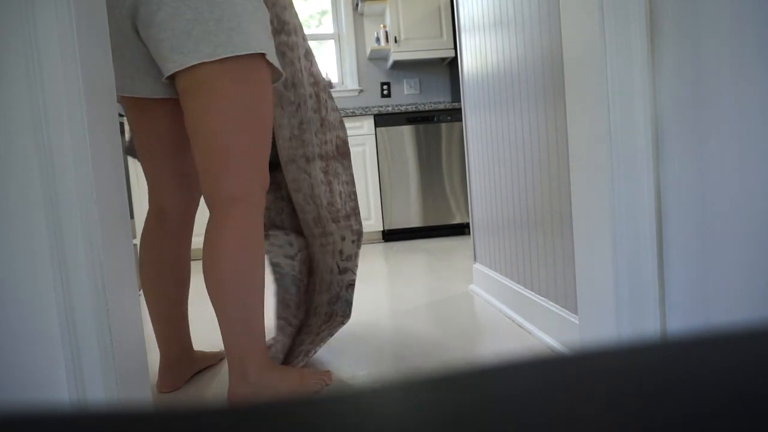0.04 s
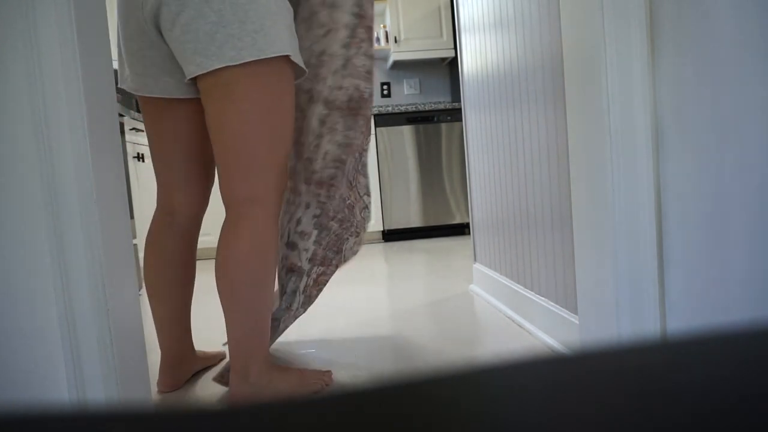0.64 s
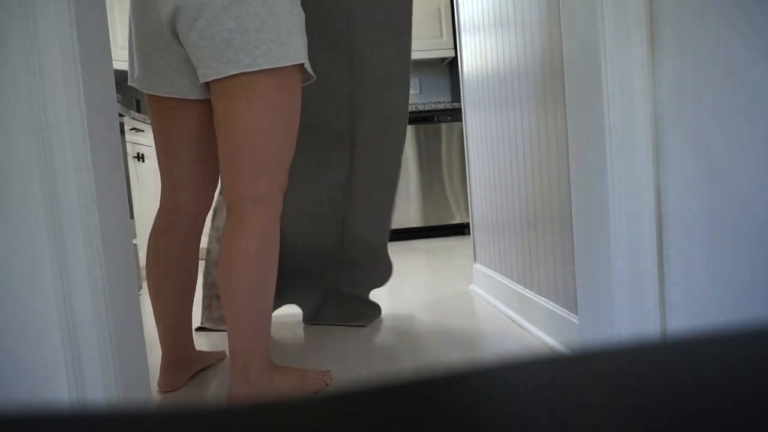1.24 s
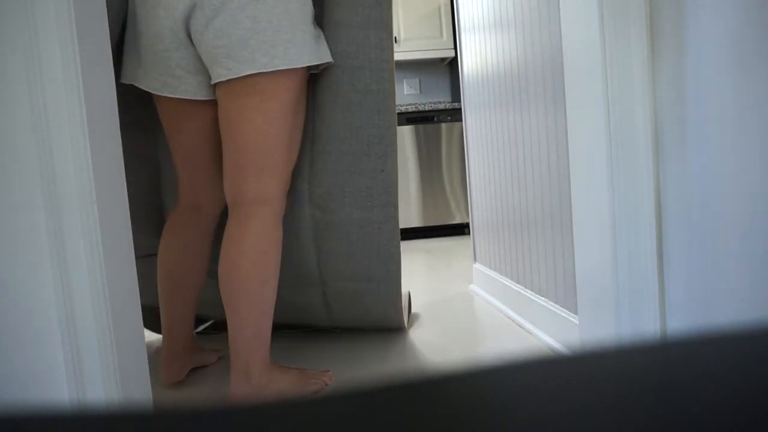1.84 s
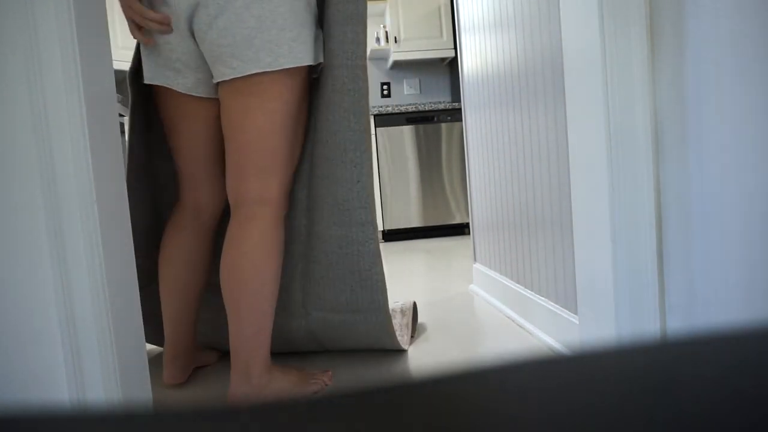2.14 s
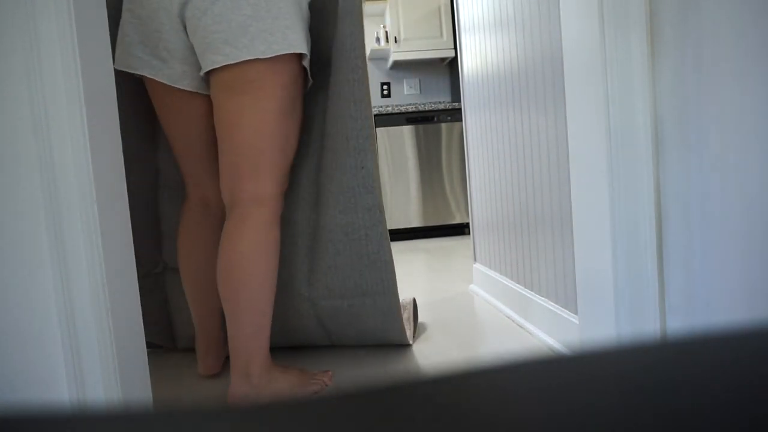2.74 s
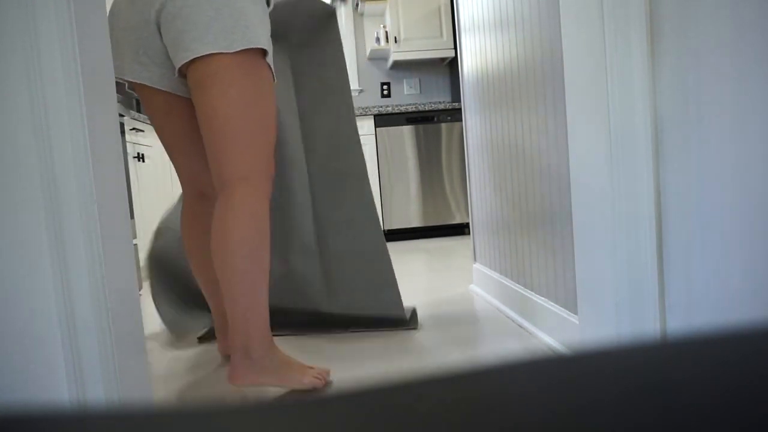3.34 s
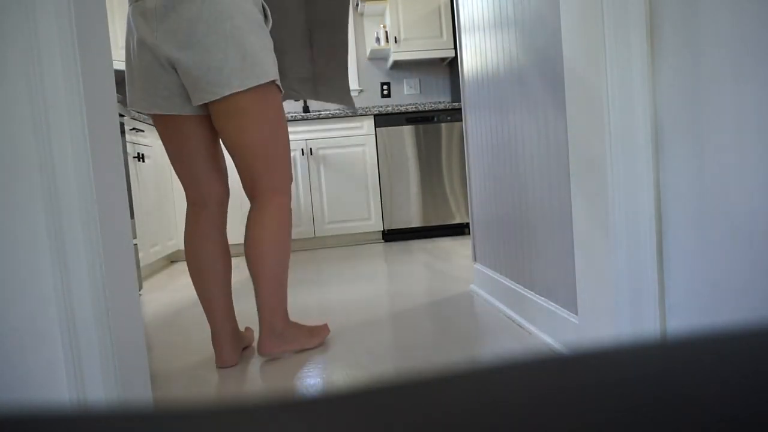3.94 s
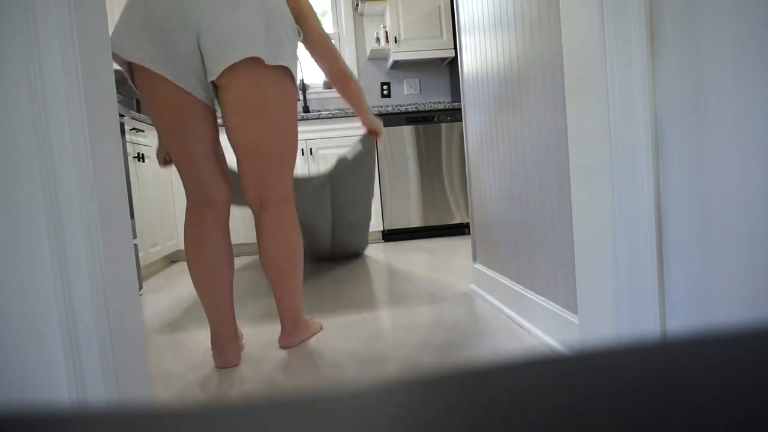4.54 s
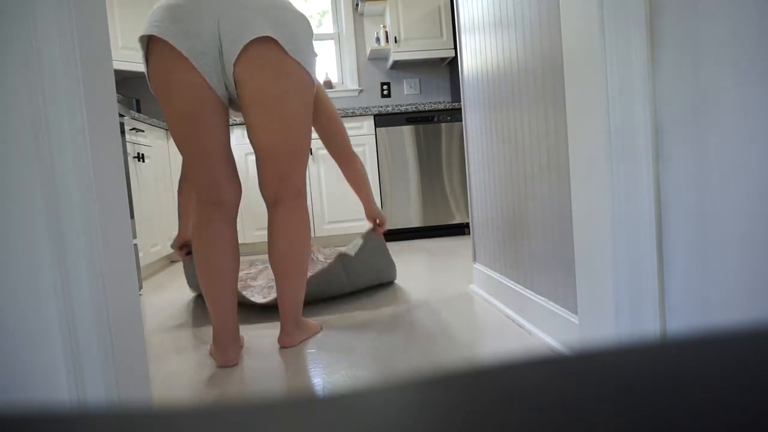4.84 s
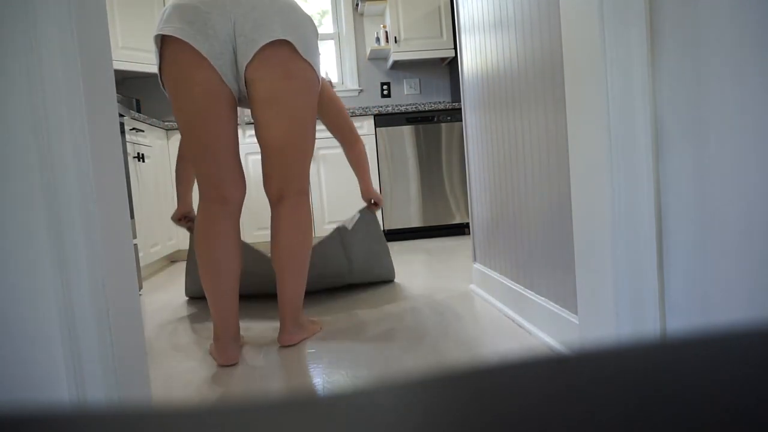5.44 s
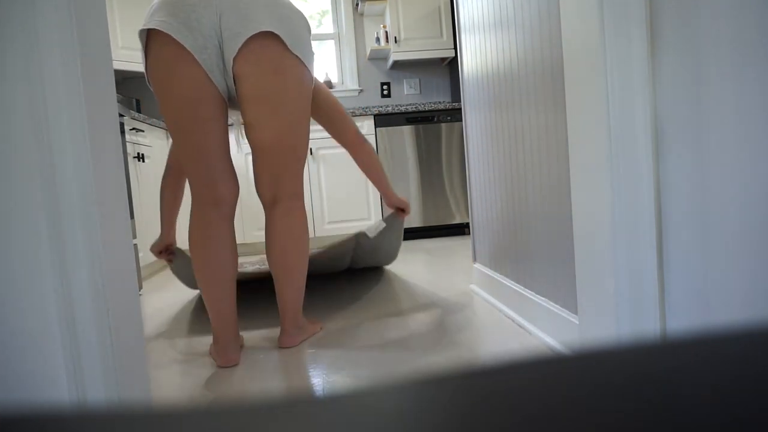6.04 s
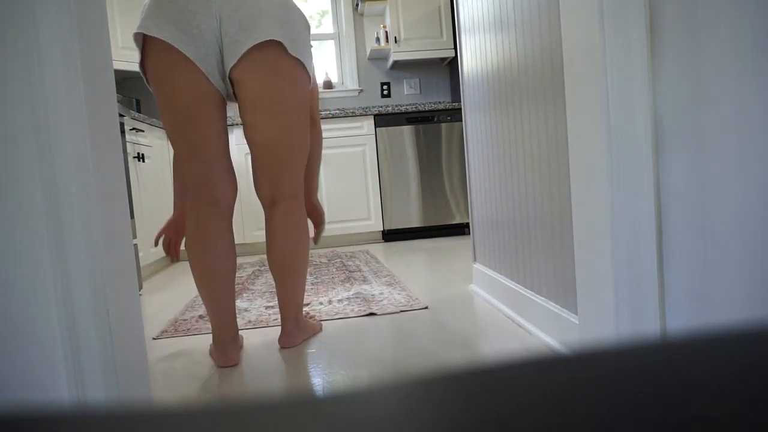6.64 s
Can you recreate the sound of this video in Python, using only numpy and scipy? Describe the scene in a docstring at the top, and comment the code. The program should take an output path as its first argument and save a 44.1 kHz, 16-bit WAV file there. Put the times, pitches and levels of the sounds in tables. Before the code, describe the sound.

A heavy woven rug is unfolded in a kitchen, rustling and sliding over itself with soft, dull flops. About halfway through it is shaken out with two loud, whooshing flaps, followed a second later by another crackling burst of flapping. After a lull it lands on the hard floor with a light slap and a brief brush. The room rings briefly over a faint appliance hum.

```python
"""Rug shaken out in a kitchen

A woven rug is unfolded, shaken out and laid on a hard floor. Each swing pushes air, makes the heavy
sheet flutter and sets creases and fibres crackling; between swings the cloth slides over itself.
The bound edge clicks, bare feet thud, the room rings briefly and an appliance hums."""
import sys
import numpy as np
from scipy import signal
from scipy.fft import rfft, irfft, next_fast_len
from scipy.io import wavfile

SR = 44100
rng = np.random.default_rng(int(sys.argv[2]) if len(sys.argv) > 2 else 0)


def put_to_file(sound):
    """Save the sound as 16-bit audio at rate SR, in the file named by the first command-line argument."""
    columns = np.atleast_2d(sound).T  # one column per channel
    safe = np.clip(columns, -1, 1)
    whole_steps = np.round(safe * 32767)
    wavfile.write(sys.argv[1], SR, whole_steps.astype(np.int16))


N = 295863
TIME_S = np.arange(N) / SR

# Event levels are relative, ahead of mix and room gains.
# rug whips out or slaps the floor: t/s, rise/s, level/dB, sharpness/dB (crackle), weight/dB (air, flutter)
SLAPS = [(3.22, 0.0054, -33, 4, 4.5), (4.558, 0.0022, -38, 5.5, 4), (4.562, 0.038, -26, 0.5, 0.5),
         (4.722, 0.001, -33.5, 2.5, 4.5), (4.868, 0.0024, -34, -2, 1), (6.187, 0.0018, -43.5, -12, -15),
         (6.2175, 0.00093, -34, -3, 2), (6.24, 0.017, -35.5, -3.5, -0.5), (6.342, 0.0037, -47, 10.5, 5),
         (6.418, 0.0041, -52, 7, -7)]
# rug swings and bellies out: t/s, rise/s, level/dB
BILLOWS = [(0.78, 0.031, -36), (1.243, 0.032, -36), (1.345, 0.058, -34), (1.44, 0.017, -37.5),
           (1.52, 0.02, -37), (1.56, 0.056, -39), (1.849, 0.02, -42.5), (2.058, 0.0079, -39),
           (2.74, 0.047, -39.5), (3.151, 0.04, -35.5), (3.29, 0.092, -29.5), (3.494, 0.0076, -33),
           (3.88, 0.04, -36.5), (4.60, 0.022, -31), (4.73, 0.013, -39), (4.80, 0.072, -36.5)]
# fold drops against the hanging rug: t/s, level/dB, crispness/dB (creases re body)
FLOPS = [(0.666, -35.5, -0.5), (0.76, -34, -35), (0.830, -36.5, -18), (0.848, -43.5, 6.5),
         (1.086, -42, 0.5), (1.166, -30.5, -16), (1.227, -29.5, -8.5), (1.936, -37, -3),
         (2.242, -37.5, -30), (3.066, -36.5, -11.5), (3.236, -28, -24), (3.447, -25, -8), (3.465, -39, -1)]
# rug scrapes over itself or the floor: t/s, rise/s, hold/s, level/dB
DRAGS = [(0.0, 0.0027, 0.11, -57.5), (0.096, 0.071, 0.043, -50.5), (0.282, 0.039, 0.032, -52.5),
         (0.592, 0.03, 0.011, -56), (1.215, 0.016, 0.0046, -45), (1.344, 0.015, 0.019, -49.5),
         (1.88, 0.061, 0.025, -46.5), (1.99, 0.014, 0.027, -47), (2.687, 0.035, 0.096, -57),
         (3.697, 0.033, 0.029, -59.5)]
# friction of the pile in the hands: t/s, level/dB
FRICTION = [(0.0, -56.5), (0.2, -60), (0.36, -64), (0.46, -62.5), (0.62, -59.5), (0.9, -56), (1.06, -62),
            (1.17, -58), (1.41, -57), (1.51, -58.5), (1.84, -55), (1.95, -51), (2.07, -54), (2.13, -58.5),
            (2.39, -58), (2.51, -56), (2.61, -50.5), (2.66, -54.5), (3.02, -53.5), (3.2, -43)]
# taut sheet pushes air: t/s, level/dB, f/Hz
PUFFS = [(0.768, -21, 630), (0.833, -24, 700), (1.259, -34, 171), (1.418, -14.5, 174), (1.433, -15.5, 387),
         (2.096, -26.5, 346), (2.247, -28.5, 630), (3.227, -11.5, 910), (3.246, -10.5, 170),
         (3.257, -14.5, 330), (3.264, -10.5, 126), (3.265, -10, 353), (3.442, -16, 157), (3.4513, -10, 416),
         (3.459, -5, 240), (4.725, -16.5, 410), (4.897, -30.5, 140), (6.222, -21.5, 800), (6.22, -25, 204)]
# stretched sheet drones: t/s, rise/s, t60/s, f/Hz, level/dB
DRONES = [(0.669, 0.022, 0.48, 294.6, -34), (1.172, 0.013, 0.17, 381, -26.5),
          (1.171, 0.018, 0.15, 229.4, -27.5), (1.24, 0.018, 0.16, 173, -20.5),
          (1.417, 0.0046, 0.27, 355, -22.5), (1.501, 0.13, 0.19, 431, -36.5),
          (1.87, 0.022, 0.16, 216, -32.5), (2.249, 0.029, 0.072, 400, -25.5),
          (3.223, 0.0043, 0.049, 890, -18.5), (3.244, 0.0054, 0.3, 383, -27.5),
          (3.456, 0.0051, 0.15, 360, -32), (3.47, 0.039, 0.28, 263.3, -25), (4.60, 0.02, 0.74, 286, -27),
          (4.724, 0.021, 0.39, 217.4, -24.5), (4.726, 0.0057, 0.36, 481, -24.5),
          (4.726, 0.017, 0.33, 425, -29)]
# bound edge cracks or clicks on the floor: t/s, level/dB, f_low/Hz, f_high/Hz, t60/s
EDGE_TICKS = [(0.332, -27, 900, 2200, 0.017), (1.091, -27.5, 1500, 5500, 0.019),
              (1.233, -34, 2000, 4970, 0.012), (1.260, -21.5, 2000, 4540, 0.02),
              (1.356, -24, 1200, 3000, 0.015), (1.4165, -21, 400, 840, 0.018),
              (1.938, -28, 600, 5970, 0.025), (2.338, -35, 3500, 5000, 0.018),
              (3.227, -29, 5500, 13000, 0.054), (3.243, -10, 5500, 8850, 0.0046),
              (3.2435, -6, 700, 1290, 0.0072), (3.267, -14, 2400, 3650, 0.012),
              (3.3055, -17, 900, 2200, 0.006), (3.4505, -1, 700, 1570, 0.012),
              (3.466, -12.5, 700, 1500, 0.28), (3.468, -24, 2700, 4500, 0.0037),
              (3.47, -18, 2200, 2990, 0.088), (4.556, -21.5, 350, 8800, 0.0067),
              (4.594, -10, 3000, 11500, 0.01), (4.599, -18, 3000, 8500, 0.035),
              (4.603, -7, 700, 6900, 0.0072), (4.608, -5.5, 1000, 6500, 0.006),
              (4.6215, -18, 900, 6000, 0.005), (4.634, -15, 350, 3000, 0.006),
              (4.7238, -10, 500, 5700, 0.013), (4.729, -19, 3800, 8900, 0.031),
              (4.7625, -19, 400, 1800, 0.0073), (4.874, -23, 1500, 6500, 0.008),
              (4.883, -10, 905, 2970, 0.0061), (6.189, -27, 700, 2500, 0.008),
              (6.2195, -12, 900, 5400, 0.0075), (6.2565, -31, 700, 4000, 0.005),
              (6.2835, -21, 700, 4000, 0.005), (6.3405, -17.5, 2400, 7500, 0.003),
              (6.421, -14, 805, 2200, 0.02)]
# pile brushes hands, legs or floor: t/s, rise/s, level/dB
BRUSHES = [(0.13, 0.085, -55), (0.25, 0.063, -57), (0.85, 0.011, -60), (1.355, 0.03, -58),
           (2.02, 0.012, -61), (2.36, 0.028, -55.5), (2.57, 0.033, -52), (3.222, 0.008, -45),
           (3.33, 0.015, -51), (3.70, 0.018, -62), (4.26, 0.03, -65), (4.47, 0.073, -60),
           (4.724, 0.005, -52), (5.17, 0.058, -68), (5.51, 0.034, -64), (5.80, 0.13, -65),
           (6.15, 0.062, -53.5), (6.385, 0.028, -50)]
# weave rasps: t/s, rise/s, t60/s, level/dB, f_start/Hz, f_end/Hz, glide/s
ZIPS = [(0.59, 0.02, 0.12, -52.5, 3700, 3880, 0.038), (3.224, 0.014, 0.03, -27, 3000, 3960, 0.015),
        (3.227, 0.022, 0.081, -30.5, 3300, 3390, 0.011)]
# bare footfalls: t/s, level/dB
STEPS = [(1.735, -35), (5.643, -47.5), (5.773, -50)]
# floor modes: f/Hz, level/dB, t60/s
FLOOR_MODES = [(110, -3.5, 0.17), (168, -2, 0.14), (223, -2.5, 0.21), (282, -7, 0.22)]

# spectral shapes of the rug's sounds: f/Hz, level/dB
AIR_SPECTRUM = [(25, -35), (42, -17), (55, -12), (68, -17.5), (100, -5), (160, 1), (200, -3), (250, -4),
                (400, -4.5), (900, -54)]
SHEET_SPECTRUM = [(70, -56), (160, -28), (205, 13), (250, -3), (370, 1), (560, 3), (850, -6.5),
                  (1200, -16.5), (2500, -55), (6000, -81)]
CREASE_SPECTRUM = [(200, -42), (550, -2), (870, 4), (1100, 2.5), (1450, 5), (2100, -3), (3300, -10.5),
                   (4500, -27), (7000, -62), (15000, -47)]
FIBRE_SPECTRUM = [(800, -7), (2500, 16), (3800, 9.5), (6000, 2.5), (9000, -2.5), (12000, -7), (16000, -18)]
RUB_SPECTRUM = [(400, 5.5), (750, 4.5), (1300, -0.5), (2000, -2), (3200, -5), (5000, -18), (10000, -26)]
PILE_SPECTRUM = [(1500, -41), (3500, 2), (6000, 3), (9000, 1), (12000, -1), (16000, -13)]
BACKING_SPECTRUM = [(400, -20), (1000, 0), (2000, 0), (3400, 5), (6000, -2), (10000, -32), (16000, -26)]
TUFT_SPECTRUM = [(2000, -6), (4000, 1.5), (7000, -2.5), (13000, -1.5), (16000, -8)]
SKIM_SPECTRUM = [(400, -12), (800, -2), (1150, 1.5), (1500, -1.5), (2000, -7), (4000, -45)]

# room decay: f/Hz, t60/s
ROOM_T60 = [(60, .5), (250, 0.6), (700, .5), (2500, 0.58), (6000, 0.42), (15000, 0.35)]
# diffuse tail: f/Hz, level/dB
TAIL_SPECTRUM = [(60, -18), (180, -7), (300, -0.5), (1000, 0), (4000, -0.5), (15000, 3.5)]
# stereo width, side re mid: f/Hz, level/dB
ROOM_WIDTH = [(60, -27), (170, -15), (350, -13.5), (700, -8), (1400, -3), (2800, -2), (6000, 3),
              (15000, -3)]
# standing waves: f/Hz, bandwidth/Hz, level/dB
ROOM_MODES = [(54.8, 2.7, 5), (100.8, 5.9, 3), (159.5, 8, -9), (248, 82, -6), (356.6, 5.9, -9),
              (383.5, 19, -5.5), (457, 11, 0), (512, 11, -5), (588, 6.8, -1), (657, 16, -2),
              (727, 8.7, 0.5), (800, 30, -8), (866, 13, 0.5), (940, 83, -5)]
# room air, spectral shape: f/Hz, level/dB
HUSH_SPECTRUM = [(12, -49), (20, -56), (44, 1.5), (101, 0), (198, -3), (328, -2.5), (357, -1), (574, -6),
                 (825, -1.5), (1030, -10.5), (1190, -12.5), (1710, -16), (2260, -18), (11400, -24),
                 (16000, -28)]
# appliance partials: f/Hz, level/dB
HUM_PARTIALS = [(285, -72), (441, -87), (700, -74.5), (802, -109), (829, -71.5)]

# layer gains: air, sheet, creases, fibres
SLAP_MIX_DB, SETTLE_MIX_DB = (-8.5, -2.5, -0.7, -2), (-15, -10, -10.5, -17)
BILLOW_MIX_DB, FLOP_MIX_DB = (1, -8.5, -18, -28), (-3, 0, 0, -18)
SHUDDER_MIX_DB, DRAG_MIX_DB = (-17, -22.5, -40, -61), (-13, -1.5, 0, -1.5)

SLAP_T60_S, FLOP_RISE_S = 0.27, 0.0029


def from_db(db):
    """Decibels to gain."""
    return 10 ** (np.asarray(db) / 20)


def at_hz(table, hz):
    """Table lookup over log frequency."""
    known_hz, values = np.transpose(table)
    return np.interp(np.log(np.maximum(hz, 1)), np.log(known_hz), values)


def bandpass(x, low_hz, high_hz):
    """Butterworth band-pass."""
    return signal.sosfilt(signal.butter(2, [low_hz, high_hz], "band", fs=SR, output="sos"), x + 1e-18)


def coloured(x, spectrum):
    """Spectral shaping; rms 1."""
    size = next_fast_len(N)
    gain = from_db(at_hz(spectrum, np.fft.rfftfreq(size, 1 / SR)))
    shaped = irfft(rfft(x, size) * gain, size)[:N]
    return shaped / np.sqrt(np.mean(shaped ** 2) + 1e-20)


def drift(per_s):
    """Random wavering; spread about 1."""
    return np.interp(TIME_S * per_s, np.arange(N), rng.standard_normal(N))


def grains(spectrum, per_s, spread_db):
    """Tiny stick-slip releases of uneven size; rms 1."""
    released = rng.random(N) < per_s / SR
    sizes = from_db(spread_db * np.minimum(rng.exponential(1, N), 4)) * rng.choice([-1, 1], N)
    return coloured(released * sizes, spectrum)


def stroke(start_s, rise_s, t60_s, hold_s=0):
    """Envelope of one movement: linear rise, hold, exponential decay."""
    out, live = np.zeros(N), slice(int(start_s * SR), int((start_s + 1) * SR))
    age_s = TIME_S[live] - start_s
    decay_db = -60 * np.maximum(age_s - rise_s - hold_s, 0) / max(t60_s, .002)
    out[live] = np.clip(age_s / max(rise_s, .001), 0, 1) * from_db(decay_db)
    return out


def power(start_s, rise_s, t60_s, level_db, hold_s=0):
    """Power envelope of one movement."""
    return (from_db(level_db) * stroke(start_s, rise_s, t60_s, hold_s)) ** 2


def layer_powers(mix_db, *powers):
    """Power in air, sheet, creases, fibres, from one shared curve or one each."""
    return from_db(mix_db)[:, None] ** 2 * np.array(powers)


def swings(air, sheet, creases, fibres):
    """Pushed air and flutter are nearly smooth; creases and fibres crackle."""
    return (air * grains(AIR_SPECTRUM, per_s=2300, spread_db=0)
            + sheet * grains(SHEET_SPECTRUM, per_s=1000, spread_db=3)
            + creases * grains(CREASE_SPECTRUM, per_s=900, spread_db=5)
            + fibres * grains(FIBRE_SPECTRUM, per_s=1400, spread_db=3.5))


def slap_crease_power(sharp_share=0.24):
    """Creases take on part of each slap's sharpness."""
    return sum(power(t, rise, SLAP_T60_S, db + sharp_share * sharp) for t, rise, db, sharp, _ in SLAPS)


def slap_power():
    """The rug whips out or hits the floor: a bright burst."""
    body = sum(power(t, rise, SLAP_T60_S, db + weight) for t, rise, db, _, weight in SLAPS)
    fibres = sum(power(t, rise, SLAP_T60_S, db + sharp) for t, rise, db, sharp, _ in SLAPS)
    return layer_powers(SLAP_MIX_DB, body, body, slap_crease_power(), fibres)


def settle_power(rise_s=0.06, t60_s=0.37):
    """The rest of the cloth follows each slap: a softer, longer rush."""
    body = sum(power(t + rise, rise_s, t60_s, db + weight) for t, rise, db, _, weight in SLAPS)
    rustle = sum(power(t + rise, rise_s, t60_s, db) for t, rise, db, _, _ in SLAPS)
    return layer_powers(SETTLE_MIX_DB, body, body, rustle, rustle)


def billow_power(t60_s=0.44, ref_db=-32.5, air_slope=1.7):
    """Soft swell of flutter and air; air takes over in wider swings."""
    body = sum(power(t, rise, t60_s, db) for t, rise, db in BILLOWS)
    air = sum(power(t, rise, t60_s, ref_db + air_slope * (db - ref_db)) for t, rise, db in BILLOWS)
    return layer_powers(BILLOW_MIX_DB, air, body, body, body)


def flop_power(t60_s=0.24):
    """A falling fold lands at once; crisper folds crackle more."""
    body = sum(power(t, FLOP_RISE_S, t60_s, db) for t, db, _ in FLOPS)
    crackle = sum(power(t, FLOP_RISE_S, t60_s, db + crisp) for t, db, crisp in FLOPS)
    return layer_powers(FLOP_MIX_DB, body, body, crackle, crackle)


def shudder_power(rise_s=0.048, t60_s=0.063, below_hz=390):
    """Flutter peaks as the whole sheet goes taut; higher puffs come from a corner and raise none."""
    flutter = sum(power(t - rise_s, rise_s, t60_s, db) for t, db, hz in PUFFS if hz < below_hz)
    return layer_powers(SHUDDER_MIX_DB, flutter)


def drag_power(t60_s=0.2):
    """A scrape swells and holds while the cloth moves."""
    return layer_powers(DRAG_MIX_DB, sum(power(t, rise, t60_s, db, hold) for t, rise, hold, db in DRAGS))


def friction(ref_db=-58.5, fade_s=(2.02, 3.76)):
    """Sliding level re ref_db, and its fade as the rug is lifted clear."""
    return np.interp(TIME_S, *np.transpose(FRICTION)) - ref_db, np.interp(TIME_S, fade_s, [1, 0])


def sliding(sheet_db=-58, rub_db=-53.5, pile_db=-66, body_slope=0.94):
    """The rug slips through the hands and over itself; pile hiss tracks friction fully, body in part."""
    friction_db, fade = friction()
    body = (from_db(sheet_db) * grains(SHEET_SPECTRUM, per_s=1100, spread_db=0.5)
            + from_db(rub_db) * grains(RUB_SPECTRUM, per_s=1500, spread_db=2.5))
    pile = from_db(pile_db) * grains(PILE_SPECTRUM, per_s=1400, spread_db=4.5)
    return fade * (from_db(body_slope * friction_db) * body + from_db(friction_db) * pile)


def puffs():
    """One pressure swing per tug, about two cycles long."""
    out = np.zeros(N)
    for start_s, level_db, hz in PUFFS:
        cycles = np.clip(hz * (TIME_S - start_s), -4, 4)
        out += from_db(level_db) * np.sin(2 * np.pi * cycles) * np.exp(-2 * cycles ** 2)
    return out


def drones(waver=0.032, sag_per_s=0.129):
    """Slack-drum notes; pitch wavers with tension and sinks as the sheet slackens."""
    out, tension = np.zeros(N), 1 + waver * drift(160)
    for start_s, rise_s, t60_s, hz, level_db in DRONES:
        live = slice(int(start_s * SR), int((start_s + 1) * SR))
        pitch_hz = hz * tension[live] * (1 - sag_per_s * (TIME_S[live] - start_s))
        tone = np.sin(2 * np.pi * np.cumsum(pitch_hz) / SR)
        out[live] += from_db(level_db) * stroke(start_s, rise_s, t60_s)[live] * tone
    return out


def ticks(click_db=9, scuff_db=-3, touch_db=10, touch_band_hz=(350, 2720), touch_t60_s=0.005):
    """Click plus scuff, no bass: edge contacts and the first touch of each falling fold."""
    out, noise = np.zeros(N), rng.standard_normal(N)
    touches = [(t + FLOP_RISE_S, db + crisp + touch_db, *touch_band_hz, touch_t60_s)
               for t, db, crisp in FLOPS]
    for start_s, level_db, low_hz, high_hz, t60_s in list(EDGE_TICKS) + touches:
        force = from_db(scuff_db) * noise * stroke(start_s - .001, .001, t60_s)
        force[int(start_s * SR)] += from_db(click_db)
        out += from_db(level_db) * bandpass(force, low_hz, high_hz)
    return out


def snaps(gain_db=-6):
    """Single ridges of the stiff backing snap with each slap."""
    force = np.sqrt(slap_crease_power())
    return from_db(gain_db) * force * grains(BACKING_SPECTRUM, per_s=270, spread_db=0.5)


def scratches(pile_db=-65, brush_t60_s=0.091, snags_per_s=260, patchy_db=-2.5, patches=7):
    """Tufts catch and let go in patches; each patch has its own band and comes and goes by itself."""
    friction_db, fade = friction()
    brushing = np.sqrt(sum(power(t, rise, brush_t60_s, db) for t, rise, db in BRUSHES))
    force = fade * from_db(friction_db + pile_db) + brushing
    edges_hz, tufts = np.geomspace(3000, 16000, patches + 1), 0
    for low_hz, high_hz in zip(edges_hz, edges_hz[1:]):
        snags = rng.random(N) < snags_per_s / SR
        size_db = -1.5 * np.minimum(rng.exponential(1, N), 3)
        patch_db = patchy_db * np.clip(drift(per_s=40), -2, 1)
        tufts += bandpass(snags * from_db(size_db + patch_db), low_hz, high_hz)
    return force * coloured(tufts, TUFT_SPECTRUM)


def weave_zip(waver=0.038):
    """Pulled fast, the weave rasps over itself; pitch climbs with speed."""
    out, roughness = np.zeros(N), 1 + waver * drift(1500)
    for start_s, rise_s, t60_s, level_db, first_hz, last_hz, glide_s in ZIPS:
        hz = np.interp(TIME_S, [start_s, start_s + glide_s], [first_hz, last_hz]) * roughness
        out += from_db(level_db) * stroke(start_s, rise_s, t60_s) * np.sin(2 * np.pi * np.cumsum(hz) / SR)
    return out


def skim(level_db=-37):
    """The released edge brushes the floor as the rug settles."""
    envelope = stroke(start_s=6.418, rise_s=0.0074, t60_s=0.32, hold_s=0.016)
    return from_db(level_db) * envelope * grains(SKIM_SPECTRUM, per_s=5100, spread_db=7)


def steps(rise_s=0.0075):
    """A soft heel sets the floor thudding."""
    return sum(from_db(db + mode_db) * stroke(t, rise_s, t60_s) * np.sin(2 * np.pi * hz * (TIME_S - t))
               for t, db in STEPS for hz, mode_db, t60_s in FLOOR_MODES)


def kitchen(x, direct_db, echo_db, onset_s=0.0017):
    """Direct sound plus a dense stereo tail, new per call, shorter and wider in the treble."""
    age_s, tail = TIME_S[:next_fast_len(SR * 3 // 4)], 0
    edges_hz = np.geomspace(30, 18000, 19)
    hz = np.fft.rfftfreq(len(age_s), 1 / SR)
    white = rfft(rng.standard_normal((2, len(age_s))))
    for low_hz, high_hz in zip(edges_hz, edges_hz[1:]):
        centre_hz = np.sqrt(low_hz * high_hz)
        band = irfft(white * ((hz >= low_hz) & (hz < high_hz)), len(age_s))
        band *= from_db(-60 * age_s / at_hz(ROOM_T60, centre_hz)) * np.minimum(age_s / onset_s, 1)
        mid, side = band * np.sqrt(2 * (high_hz - low_hz) / SR / np.sum(band ** 2, axis=1, keepdims=True))
        stereo = mid + from_db(at_hz(ROOM_WIDTH, centre_hz)) * side * [[1], [-1]]
        tail += from_db(at_hz(TAIL_SPECTRUM, centre_hz)) * stereo
    return from_db(direct_db) * x + from_db(echo_db) * signal.fftconvolve(x[None], tail, axes=1)[:, :N]


def standing_waves(x, null_hz=200, null_width_hz=32, null_depth=0.98):
    """The walls lift and prolong low notes and cancel one between them."""
    x = x - null_depth * signal.lfilter(*signal.iirpeak(null_hz, null_hz / null_width_hz, fs=SR), x)
    return x + sum(from_db(db) * signal.lfilter(*signal.iirpeak(hz, hz / width_hz, fs=SR), x)
                   for hz, width_hz, db in ROOM_MODES)


def background(hush_db=-58, side_db=-7):
    """Soft room air and an unsteady appliance hum."""
    mid = coloured(rng.standard_normal(N), HUSH_SPECTRUM)
    side = coloured(rng.standard_normal(N), [(hz, db + at_hz(ROOM_WIDTH, hz)) for hz, db in HUSH_SPECTRUM])
    hum = sum(from_db(db) * np.sqrt(2) * np.sin(2 * np.pi * hz * TIME_S + drift(4.8))
              for hz, db in HUM_PARTIALS)
    return from_db(hush_db) * (mid + from_db(side_db) * side * [[1], [-1]]) + hum


def scene(patches=4, folds_db=1.5):
    """Several patches of the wide rug sound at once, each with its own echoes, slightly to the right."""
    layer_gains = np.sqrt(slap_power() + settle_power() + billow_power()
                          + flop_power() + shudder_power() + drag_power())
    folds = from_db(folds_db * drift(130))   # passing folds bunch the grains of all patches
    cloth = sum(kitchen(folds * (swings(*layer_gains) + sliding()), direct_db=-4, echo_db=-3.5)
                for _ in range(patches)) / np.sqrt(patches)
    edge = kitchen(ticks() + snaps(), direct_db=-5.5, echo_db=-9.5)
    weave = kitchen(scratches() + weave_zip() + skim(), direct_db=-5, echo_db=-5)
    thuds = kitchen(puffs() + drones() + steps(), direct_db=-5, echo_db=-10)
    return standing_waves(cloth + edge + weave + thuds) * from_db([[-.3], [.3]]) + background()


def record(dry, cutoff_hz=15900):
    """Steep low-pass."""
    return signal.sosfilt(signal.ellip(10, .1, 80, cutoff_hz, fs=SR, output="sos"), dry)


dry = scene()
out = record(dry)
put_to_file(out)
```